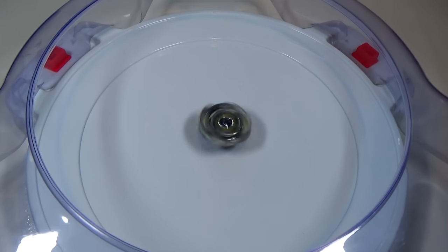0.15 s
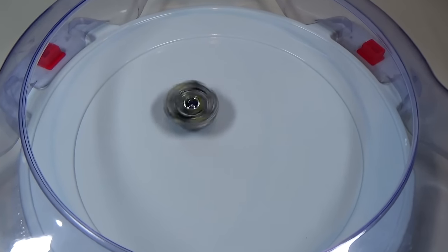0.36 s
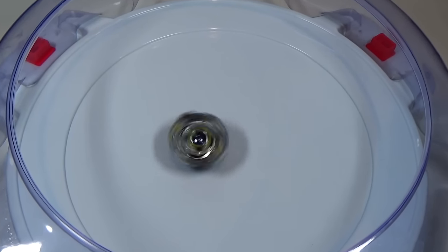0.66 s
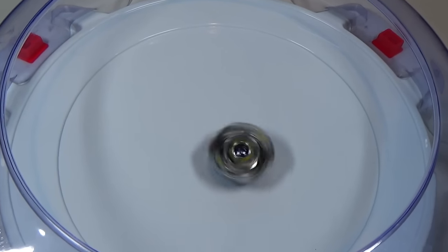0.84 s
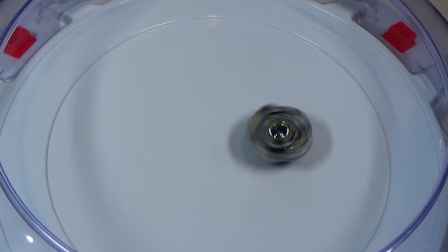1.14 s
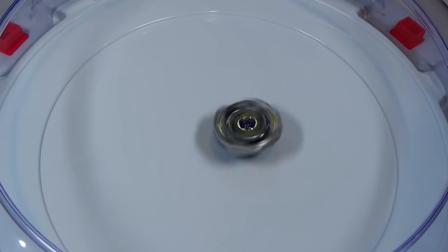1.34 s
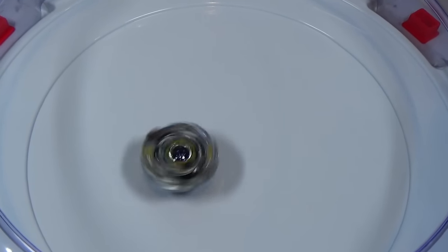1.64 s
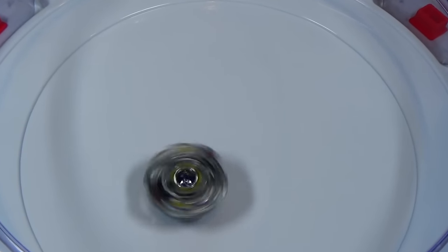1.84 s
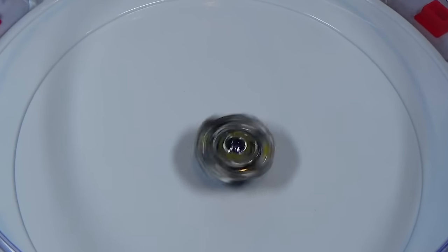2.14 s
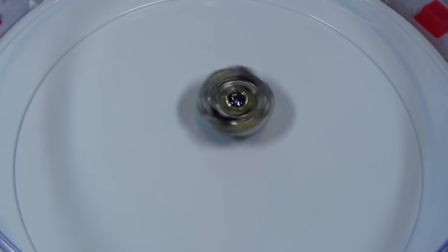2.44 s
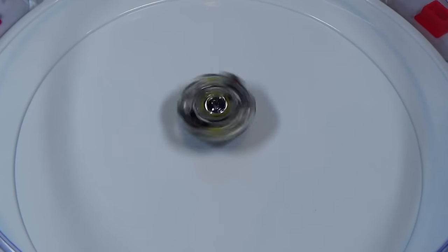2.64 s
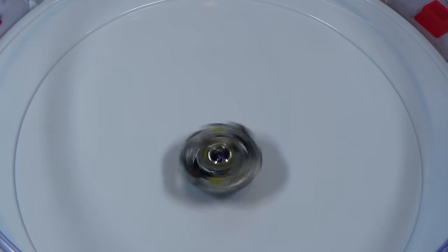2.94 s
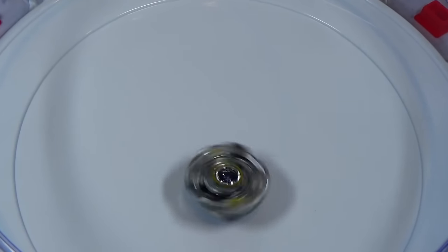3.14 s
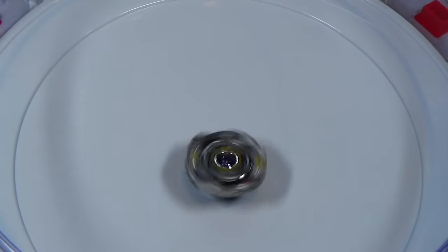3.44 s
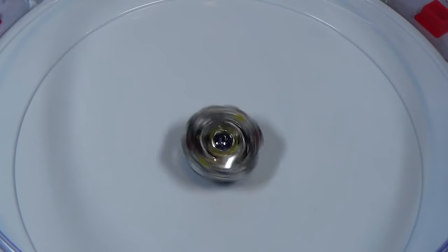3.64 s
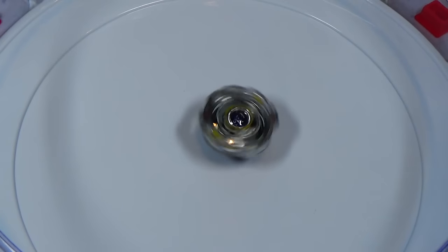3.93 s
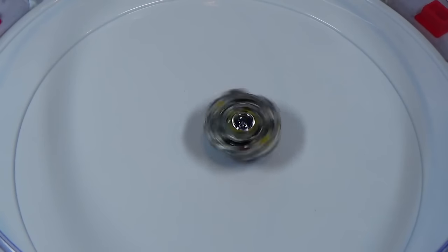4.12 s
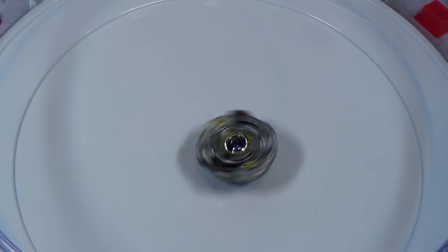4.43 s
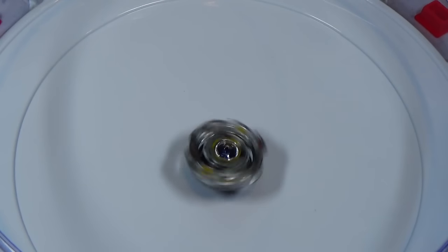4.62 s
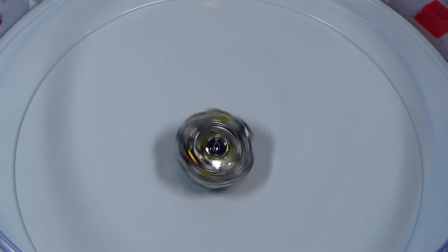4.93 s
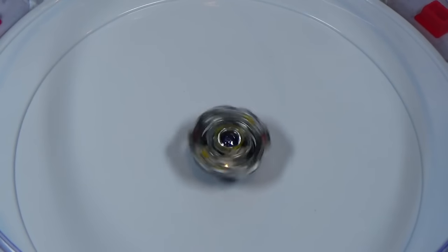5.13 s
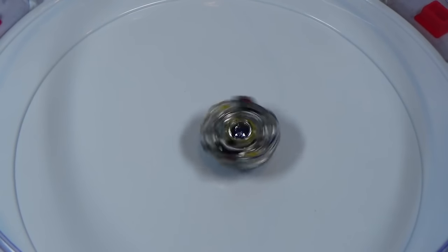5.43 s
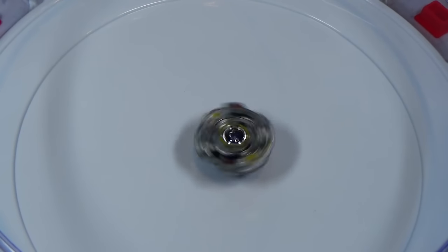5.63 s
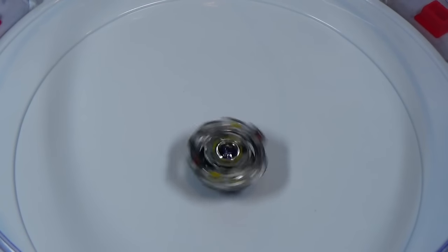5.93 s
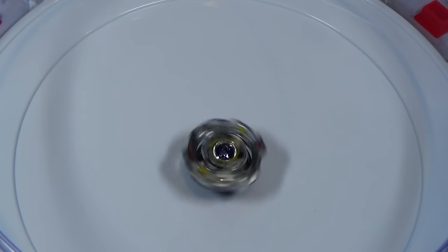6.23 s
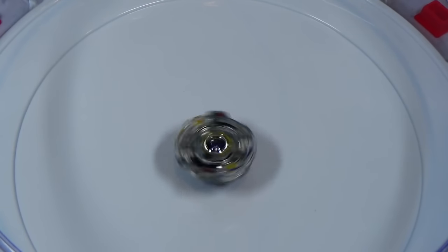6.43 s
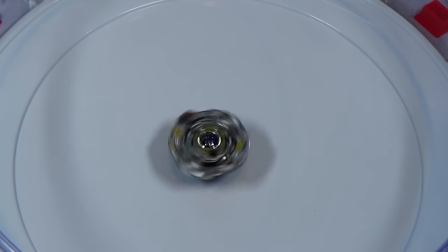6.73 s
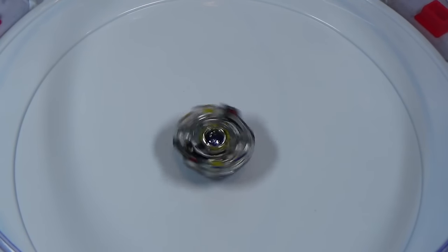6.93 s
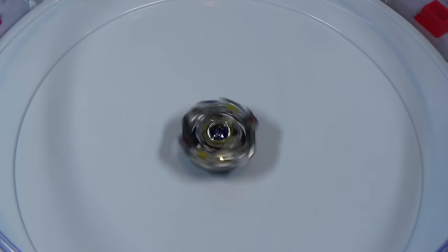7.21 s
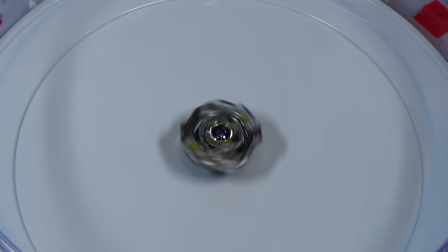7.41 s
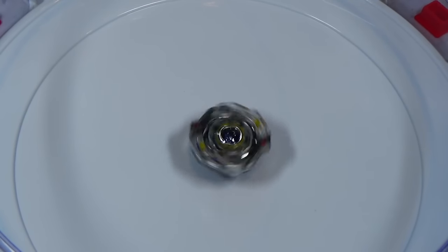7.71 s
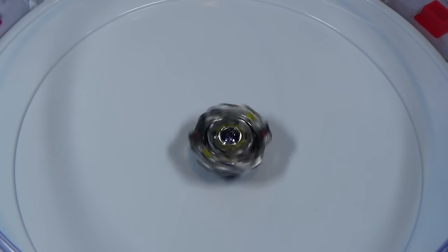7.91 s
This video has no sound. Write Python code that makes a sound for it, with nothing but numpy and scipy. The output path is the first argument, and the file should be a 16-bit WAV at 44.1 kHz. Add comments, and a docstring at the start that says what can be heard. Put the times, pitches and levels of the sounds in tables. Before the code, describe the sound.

Heard up close in a quiet room, a top skitters around a plastic dish with a dense, scratchy rattle. Its plastic body clacks and its metal rings jingle while the dish answers with short, hollow booms. After a lively first half the tapping nearly stops for a moment, then returns lighter over soft rubbing. Faint hiss and electrical hum lie underneath.

```python
"""In a quiet room with a faint mains hum, a spinning top circles in a thin plastic bowl.
Its unbalanced tip rubs, skips and taps the bowl about once a turn. Each impact excites the bowl's
damped modes, a low boom and a higher knock, and shakes the top's loose parts: the plastic clacks
and the metal rings jingle. Short echoes follow, and two close microphone ports give the stereo image."""
import sys
import numpy as np
from scipy import signal
from scipy.fft import rfft, irfft, next_fast_len
from scipy.io import wavfile
from scipy.ndimage import uniform_filter1d

SR = 44100
rng = np.random.default_rng(int(sys.argv[2]) if len(sys.argv) > 2 else 0)


def transcribe(signal):
    """Save signal, clipped to [-1, 1], as a 16-bit WAV file at the path in sys.argv[1]."""
    frames = np.atleast_2d(signal).T
    limited = np.clip(frames, -1, 1)
    pcm = np.round(limited * 32767).astype(np.int16)
    wavfile.write(sys.argv[1], SR, pcm)


N = 355666
RISE_S, BOOM_LEAD_S = 0.001425, 0.00348  # rattle and knock, and the boom, begin this long before a tap


def gain_of(db):
    """Amplitude ratio of a level in decibels."""
    return 10 ** (np.asarray(db) / 20)


def unit_rms(x):
    """Normalisation to an rms of 1."""
    return x / np.sqrt(np.mean(x ** 2) + 1e-20)


def curve_at(points, hz):
    """Interpolation of a spectrum on a logarithmic frequency axis."""
    point_hz, value = np.transpose(points)
    return np.interp(np.log(hz + 1), np.log(point_hz + 1), value)


def resonator(x, hz, bandwidth_hz):
    """Damped oscillator: a unit impulse leaves a decaying sine of amplitude 1."""
    r, w = np.exp(-np.pi * bandwidth_hz / SR), 2 * np.pi * hz / SR
    return signal.lfilter([0, np.sin(w)], [1, -2 * r * np.cos(w), r * r], x)


def minimum_phase(spectrum):
    """Causal impulse response, peak 1: its phase is the Hilbert transform of the log gain."""
    db = np.maximum(curve_at(spectrum, abs(np.fft.fftfreq(4096, 1 / SR))), -100)
    response = np.fft.ifft(np.exp(np.conj(signal.hilbert(np.log(gain_of(db)))))).real[:2048]
    return response / abs(response).max()


def decay(x, ms):
    """Exponential relaxation: each impulse dies away with this time constant."""
    return signal.lfilter([1], [1, -np.exp(-1000 / (ms * SR))], x)


def room_noise():
    """Partly coherent noise: hiss and rumble with faint drifting patches, plus the tones of mains hum."""
    spectrum = [(12, -44), (20, -16), (49, -21), (86, -17), (104, -1), (123, -6), (177, -18), (241, -30),
                (270, -11), (410, -18), (574, -20), (1530, -23), (4540, -31.5), (6180, -31), (11000, -42.5),
                (16000, -40)]  # background noise: frequency_hz, relative_density_db
    coherence = [(60, 1), (240, 0.95), (950, 0.057), (3770, 0.26), (15000, 1)]  # likeness of left and right: frequency_hz, correlation
    hum_tones = [(119.5, -60.5), (238, -61.5)]  # mains hum: pitch_hz, rms_db
    frames, hz = N // 256 + 5, np.fft.rfftfreq(1024, 1 / SR)
    a, b, c, d, patches = rng.standard_normal((frames, 513, 5)).T
    patches = unit_rms(uniform_filter1d(uniform_filter1d(patches, size=12, axis=0), size=14, axis=1))
    alike = np.clip(curve_at(coherence, hz), -1, 1)[:, None]
    left = a + 1j * b
    right = alike * left + np.sqrt(1 - alike ** 2) * (c + 1j * d)
    bands = np.array([left, right]) * gain_of(curve_at(spectrum, hz)[:, None] + 0.27 * patches)
    hiss = gain_of(-53.5) * unit_rms(signal.istft(bands, nperseg=1024, noverlap=768)[1][:, :N])
    t = np.arange(N) / SR
    return hiss + sum(np.sqrt(2) * gain_of(db) * np.sin(2 * np.pi * f * t) for f, db in hum_tones)


def echoes(x):
    """Reverberation: sparse reflections of random sign, each band dying at its own rate."""
    decay_times = [(200, 0.1), (1400, 0.074), (4000, 0.033), (10000, 0.023)]  # reverberation time: frequency_hz, t60_s
    reflections = np.zeros((2, SR // 2))
    at = np.arange(100, SR // 2 - 20, 20) + rng.integers(0, 20, (2, (SR // 2 - 101) // 20))
    np.put_along_axis(reflections, at, rng.choice([-1., 1.], at.shape), 1)
    hz, t, bands = signal.stft(reflections, SR, nperseg=256)
    tail = signal.istft(bands * gain_of(-60 * t / curve_at(decay_times, hz)[:, None]), SR, nperseg=256)[1]
    split_rad = 0.15  # close ports hear much the same echoes; 0 is alike
    tail[1] = np.cos(split_rad) * tail[0] + np.sin(split_rad) * tail[1]
    return signal.fftconvolve(x[None], tail / np.linalg.norm(tail[0]), axes=1)[:, :N]


def microphone_ports(x):
    """Stereo cues: the two ports differ a little in phase and level."""
    phase_lead = [(60, 0.1), (250, 0.18), (450, 0.34), (1100, 0.51), (2000, 0.26), (5000, 0.16),
                  (7000, 0.39), (10000, 0.017), (16000, 0.022)]  # phase difference: frequency_hz, left_lead_rad
    level_tilt = [(60, -.6), (700, -.5), (1290, .5), (2380, -.4), (4400, 0)]  # level difference: frequency_hz, left_minus_right_db
    size = next_fast_len(N + SR // 10)
    hz = np.fft.rfftfreq(size, 1 / SR)
    half = gain_of(curve_at(level_tilt, hz) / 2) * np.exp(.5j * curve_at(phase_lead, hz))
    return irfft(rfft(x, size) * np.array([half, 1 / half]), size)[:, :N]


def tip_path():
    """Sliding contact: the rubbing amplitude and the distance from the bowl's centre at each sample."""
    path = [(0.0, -30.5, 0.8), (0.2, -42, 0.4), (0.56, -33.5, 1), (0.9, -41, 0.4), (1.3, -36.5, 0.98),
            (1.62, -41, 0.32), (1.95, -36.5, 0.8), (2.25, -44, 0.74), (2.62, -34.5, 0.57), (3.0, -43, 0.76),
            (3.281, -44, 0.41), (3.5, -38, 0.43), (3.8, -47.5, 0.52), (4.35, -46, 0.33), (4.9, -53.5, 0.56),
            (5.5, -44.5, 0.22), (6.64, -44, 0.4), (8.06, -44, 0.3)]  # course of the tip: time_s, rub_db, radius_fraction
    time_s, rub_db, radius = np.transpose(path)
    t = np.arange(N) / SR
    return gain_of(np.interp(t, time_s, rub_db)), np.clip(np.interp(t, time_s, radius), 0, 1)


def tip_grit(per_s, spread_db):
    """Shot noise: random small skips of the tip, a few of them large."""
    size = gain_of(spread_db * np.minimum(rng.exponential(1, N), 4))
    return unit_rms(size * rng.choice([-1., 1.], N) * (rng.random(N) < per_s / SR))


def tip_taps(turns):
    """Rotating imbalance: after a landing the tip taps and rebounds once a turn, as a rule ever weaker."""
    # landings of the tip: start_s, rattle_db, boom_over_rattle_db, jingle_over_clack_db, loss_per_turn_db
    landings = [(0.0075, -32.5, 6.5, 2, 25), (0.0337, -24.5, 1, 7, -2), (0.0539, -14.5, -5, 5, 24),
                (0.1161, -24.5, -9, -5, 8), (0.1296, -28.5, -9, -3, 8), (0.1416, -25.5, -1, 8, 14),
                (0.209, -30.5, -1, -7.5, 28), (0.2693, -28, -9, -12, 39), (0.3242, -32.5, 3.5, -4, 8),
                (0.3377, -26.5, -4, -5.5, 14), (0.3909, -23.5, 0.5, 8, 5.5), (0.4496, -25, 2.5, 3, 9),
                (0.4954, -24, 7.5, 1.5, 3), (0.5411, -20, -1, 0, 2.5), (0.5895, -25.5, 2.5, -0.5, 18),
                (0.6297, -22, 4.5, -0.5, 8), (0.6445, -23, 3, 2, 8.5), (0.682, -30, -7, 3, 26),
                (0.7077, -22, -9, 2.5, 23), (0.737, -25, 1.5, 9, -3), (0.7579, -18, -5, 0.5, 20),
                (0.8527, -32.5, 0.5, -7, 24), (0.9256, -30, -8, 2.5, 18), (0.9736, -30.5, -1.5, -5.5, 18),
                (1.0413, -26, 7.5, 1, 8), (1.0563, -18.5, -5, -1, 13), (1.12, -27.5, 6.5, 7, 7),
                (1.1618, -21.5, -1.5, -2, 15), (1.1891, -24.5, -2, -2, 3), (1.229, -24, -6, 9, -0.5),
                (1.2603, -20, 3, 4, 19), (1.297, -23.5, 4, -1.5, 3.5), (1.33, -23.5, -2, 5, 0),
                (1.3643, -20.5, -3.5, 8, 10.5), (1.4157, -21.5, 1.5, 0, 8), (1.4324, -17.5, -3, 0.5, 12.5),
                (1.5016, -24, 0, 4, -1), (1.5214, -21, -2.5, -1, 18), (1.6064, -31.5, 1, -2, 8.5),
                (1.6758, -39.5, 1, 1, 21), (1.7036, -33, -1, -12, 10), (1.746, -30.5, 7, 1, 8),
                (1.7609, -29, 0.5, -1.5, 7.5), (1.815, -22.5, -4, 1.5, 10), (1.8673, -27.5, 0.5, 0, 1),
                (1.9257, -25.5, 2, 3, 4), (1.9667, -24.5, 1.5, 6, 5.5), (2.0357, -28.5, 12, 0, 8),
                (2.0487, -21.5, 2.5, 0.5, 17), (2.132, -36.5, -5, -6, -10), (2.1548, -25, -7, -15, 8.5),
                (2.2485, -23.5, 0, -5, 4), (2.2675, -23, -2, -1, 14), (2.3448, -29.5, -1, -3, 8),
                (2.3577, -27.5, 3.5, -4.5, 8), (2.3797, -29, -7, 1, 25), (2.42, -28, 8.5, 1, 4),
                (2.439, -20.5, -2.5, 2.5, 27), (2.4635, -24.5, -3.5, -3, 10), (2.5007, -33.5, 2, 0, 3),
                (2.5625, -29.5, 5, -8, 6.5), (2.6158, -25.5, -7, -5, 20), (2.64, -29, 0, -1, 2.5),
                (2.685, -24, 1, 1.5, 17), (2.7239, -24, 2, -3.5, 4), (2.7759, -21, 1.5, 0.5, 8),
                (2.7914, -26, 4, -3, 10), (2.8553, -26, 4.5, -1, 8), (2.873, -19, -2, -3, 24),
                (2.9644, -25.5, 7.5, 3, 0), (2.9847, -19, -5, 1, 17), (3.07, -24, 4, 5, 6.5),
                (3.164, -37.5, 5, 0, 3), (3.1915, -31.5, 1, -10, 7.5), (3.3478, -31, 0.5, -3, 8),
                (3.3608, -33.5, 3, 4, 2), (3.4047, -30, 2, 4, 9.5), (3.4697, -27.5, -1.5, -5, 9),
                (3.517, -29, -3.5, -17, 10), (3.544, -24, 2, 2, 8), (3.6357, -30.5, 1.5, -7, 2),
                (3.6586, -22.5, -10, 1.5, 29), (3.7843, -29, 1, -7, 6), (3.8043, -24, -3, -3.5, 14),
                (3.9028, -31.5, 4.5, -7, 3), (3.941, -37.5, 2, 0, 20), (4.0167, -38.5, 1, -5, 19),
                (4.0398, -39.5, -2, 6, 25), (4.18, -39.5, 3.5, -5, 3), (4.2307, -33.5, 3, -4, 8),
                (4.2486, -29, 0, -1.5, 7.5), (4.3167, -26, -3.5, -6, 13), (4.3707, -34, 1, 1, 8),
                (4.3831, -32.5, 4.5, 0, 8.5), (4.414, -33, 3, -2.5, 17), (4.487, -35.5, 1, 3, 12),
                (4.5119, -29.5, -2, -5, 18), (4.634, -36.5, 0.5, -10, 8), (4.6435, -39.5, -2, 1.5, 13),
                (5.0023, -40.5, 6.5, -9, 10), (5.0678, -41, 4, -6, 8.5), (5.1394, -37.5, 0, -8, 8),
                (5.1546, -37.5, 1.5, 11, 16), (5.223, -30.5, 1, -0.5, 8), (5.24, -29.5, 2, -1, 5.5),
                (5.2896, -30, -10, -2, 8), (5.305, -32.5, 2, 3, 7), (5.3719, -33, -5, -6, 1),
                (5.3802, -31, 1, -6, 7), (5.4384, -35, 1.5, -4, 5.5), (5.503, -28.5, -9, -5.5, 30),
                (5.5387, -37, -3, -1, 32), (5.5758, -27, -14, -9.5, 8), (5.5946, -35, 5, -2, 12),
                (5.6346, -37.5, -6, -6, 21), (5.701, -33, -6, -7, 8), (5.716, -30.5, 0, -3.5, 17),
                (5.7504, -37, 2.5, 2, -2.5), (5.7808, -38.5, 8.5, -1, 8), (5.8451, -35.5, -8, -1, 11),
                (5.8581, -35, 6, 2, 5.5), (5.8991, -31.5, -1, 0, 7), (5.919, -29.5, 3, 0, 5.5),
                (6.0033, -30.5, -3.5, -8, 16), (6.0485, -39, 2, -6, 11), (6.1253, -33.5, 1.5, -8, 25),
                (6.2046, -34.5, -3, -4, 11), (6.288, -32, -11, -5, 5), (6.3078, -43, 7.5, -3, 4.5),
                (6.4045, -31, 1, -2, 13), (6.4256, -27, 1, 4.5, 8), (6.4423, -32.5, 0, 7, 10),
                (6.4624, -30, 1.5, -1, 20), (6.4845, -29, 0, -7, 9), (6.6003, -28, -4.5, -9, 15),
                (6.6258, -27.5, 0, 4, 22), (6.658, -30.5, -3, -3, 8), (6.6741, -31.5, 1.5, 2, 3.5),
                (6.7166, -31, 2, 1, 17), (6.7536, -33.5, 3, -1, 3.5), (6.835, -36, -3, -15, 8),
                (6.8463, -37.5, 4, 3, 9), (6.8888, -35, -5, -8, 24), (6.9496, -29.5, -4, -2, 15),
                (6.9725, -28.5, 2, -1.5, 8), (6.987, -34, 0.5, 5, 4.5), (7.046, -32, 3.5, -6, 8),
                (7.0649, -32.5, 3.5, 0, 8), (7.0812, -34.5, 4, 5, 2), (7.1192, -35, 2, -5, 12),
                (7.1421, -32, 3.5, -1, 21), (7.1716, -30.5, 0.5, -3, 5), (7.2267, -33, 3.5, -5, 8),
                (7.242, -33, -4, 2, 29), (7.2776, -33.5, -3, -8, 8), (7.3003, -32, 5.5, 1, 9.5),
                (7.3787, -36.5, -7, -3.5, 17), (7.4228, -37.5, 3, -6, 0.5), (7.463, -31.5, -0.5, -2.5, 19),
                (7.5467, -35, -4, -6, 34), (7.5802, -33, -1.5, 1, 11), (7.6281, -31.5, 5, -2, 8),
                (7.6457, -32.5, 6.5, 0, 8), (7.662, -33, -7, 11, 17), (7.706, -30.5, -4, -7, 8),
                (7.7253, -31.5, 2.5, -2, 10), (7.8059, -40, 1, -3, 22), (7.8462, -38, 1.5, -7, 5),
                (7.8689, -39.5, 3.5, 1, 5), (7.9479, -30.5, -5.5, -5, 14), (8.0284, -36, -0.5, -1, 14)]
    start_s, rattle_db, boom_over_db, bright_db, loss_db = np.transpose(landings)[:, :, None]
    spin_hz, slowing_hz_per_s = 57, 1.0
    rebound_turns, jitter_turns, spread_db = 0.66, 0.09, 2.0
    step = np.arange(2 * turns + 1)
    later, rebound = step > 0, step % 2
    turn = step // 2 + rebound_turns * rebound
    turn_s = 1 / (spin_hz - slowing_hz_per_s * start_s)
    late, jingle, clack, boom, knock = np.moveaxis(rng.standard_normal((len(start_s), len(step), 5)), 2, 0)
    tap_s = start_s + (turn + jitter_turns * later * np.clip(late, -2, 2)) * turn_s
    level_db = rattle_db - loss_db * turn
    jingle_db = level_db + np.where(later, spread_db * jingle, np.minimum(bright_db, 0)) - 5 * rebound
    clack_db = level_db + np.where(later, spread_db * clack, -np.maximum(bright_db, 0)) - 6.5 * rebound
    boom_db = level_db + boom_over_db + spread_db * later * boom - 2 * rebound
    knock_db = level_db + 0.49 * boom_over_db + spread_db * knock - 0.5 * rebound
    before_next = start_s + (turn + .35) * turn_s < np.append(start_s[1:], N / SR)[:, None]
    return [column[~later | before_next] for column in (tap_s, jingle_db, clack_db, boom_db, knock_db)]


def rattle(colour, modes, tap_s, tap_db, rub_db, modes_db, rise_ms, fall_ms, spread_db):
    """Source and filter: loose parts chatter at each tap, heard through a broad colour and narrow modes."""
    rub, _ = tip_path()
    mode_mix = rng.standard_normal((len(tap_s), len(modes)))
    roughness = gain_of(2.92 * unit_rms(uniform_filter1d(rng.standard_normal(N), size=30)))
    rubbing = gain_of(rub_db) * rub * tip_grit(per_s=6000, spread_db=4.0)
    onsets = np.clip(np.round((tap_s - RISE_S) * SR).astype(int), 0, N - 1)

    def chatter(db):
        """Amplitude-modulated noise: a burst at each tap, over the rubbing."""
        hits = np.zeros(N)
        np.add.at(hits, onsets, gain_of(db))
        skid = gain_of(-12) * decay(hits[::-1], ms=2.2)[::-1] * (1 - np.sign(hits))  # the tip slides in
        envelope = decay(hits, fall_ms) - 0.21 * decay(hits, rise_ms) + skid
        return envelope * roughness * rng.standard_normal(N) + rubbing

    sound = signal.oaconvolve(chatter(tap_db), minimum_phase(colour))[:N]
    for k, (hz, bandwidth_hz, db) in enumerate(modes):
        shake = chatter(tap_db + spread_db * mode_mix[:, k])
        sound += gain_of(db + modes_db) * np.sqrt(bandwidth_hz / SR) * resonator(shake, hz, bandwidth_hz)
    return sound


def plastic_clack(tap_s, tap_db):
    """Forced vibration: chatter drives the resonances of the top's plastic body."""
    colour = [(710, -23.5), (1200, -9), (1590, -3.5), (2150, -5.5), (3410, -4.5), (4910, -12.5),
              (5400, 0.5), (6200, -24), (8060, -45), (13600, -120)]  # broad spectrum of the clack: frequency_hz, density_db
    modes = [(2737, 68, 9), (3430, 170, 11.5), (3900, 50, -1), (4180, 66, -3), (4640, 25, -8),
             (5430, 100, 2)]  # body modes: pitch_hz, bandwidth_hz, level_db
    return rattle(colour, modes, tap_s, tap_db, rub_db=-29.0, modes_db=3,
                  rise_ms=0.79, fall_ms=4.19, spread_db=1.5)


def metal_jingle(tap_s, tap_db):
    """Forced vibration: chatter drives the high resonances of the top's loose metal rings."""
    colour = [(3820, -35), (6500, -11), (8370, 3), (9090, 0.5), (10600, 2.5), (14100, -3.5), (15200, -10),
              (16000, -17.5)]  # broad spectrum of the jingle: frequency_hz, density_db
    modes = [(6790, 24, -4), (7240, 90, -6), (7450, 78, 2), (8140, 16, 3.5), (8760, 180, -5),
             (8740, 40, -5), (10230, 280, 4), (10650, 60, -1), (12400, 120, -8), (13580, 20, 4),
             (14700, 45, -3)]  # ring modes: pitch_hz, bandwidth_hz, level_db
    return rattle(colour, modes, tap_s, tap_db, rub_db=-22.5, modes_db=-3.5,
                  rise_ms=0.4, fall_ms=3.04, spread_db=4.5)


def struck_bowl(modes, tap_s, tap_db, rub_db, early_s, spread_db, detune, push_ms, damp_ms):
    """Modal superposition: the spot struck sets the mix of modes, and the next contact damps them."""
    rub, radius = tip_path()
    hz, bandwidth_hz, rim_db, centre_db = np.transpose(modes)[:, :, None]
    skips = gain_of(rub_db) * rub * tip_grit(per_s=310, spread_db=3.0)
    sound = np.zeros(N)
    for k in range(len(modes)):
        coupling = gain_of(centre_db[k] + (rim_db[k] - centre_db[k]) * radius)
        sound += (-1) ** k * resonator(skips * coupling, hz[k, 0], bandwidth_hz[k, 0])
    starts, t = np.clip(tap_s - early_s, 0, (N - 1) / SR), np.arange(SR // 12) / SR
    gaps = abs(np.diff(starts, append=np.inf))
    chance = rng.standard_normal((len(tap_s), 3, len(modes), 1))
    grips = np.minimum(gain_of(np.diff(tap_db, append=0) - 2.0), 1)  # a light next touch damps less
    for start_s, free_s, grip, db, (spot, load, phase) in zip(starts, gaps, grips, tap_db, chance):
        at = round(start_s * SR)
        size = gain_of(centre_db + (rim_db - centre_db) * radius[at] + spread_db * spot)
        loaded_hz = hz * (1 + detune * load)  # the top's weight shifts each mode a little
        partials = size * np.exp(-np.pi * bandwidth_hz * t) * np.sin(2 * np.pi * (loaded_hz * t + phase))
        blow = partials.sum(axis=0) * (1 - np.exp(-1000 * t / push_ms))  # the tip presses in gradually
        blow *= gain_of(db) / np.std(blow[:SR // 100])  # the tap sets the level, whatever the mix
        blow *= np.exp(-1000 * grip * np.maximum(t - free_s, 0) / damp_ms)
        sound[at:at + len(blow)] += blow[:N - at]
    return sound


def wall_knock(tap_s, tap_db):
    """Impact excitation: the higher modes of the bowl's wall die quickly, as a knock."""
    modes = [(623, 81, -1, -0.5), (779, 38.4, 2.5, -3), (873, 85, 6, 7), (990, 51, 2, 1),
             (1131, 60, 3.5, 0.5), (1321, 79, -1, 2.5), (1572, 46, -0.5, 2)]  # wall modes: pitch_hz, bandwidth_hz, struck_off_centre_db, struck_centre_db
    return struck_bowl(modes, tap_s, tap_db, rub_db=-36.5, early_s=RISE_S,
                       spread_db=2.0, detune=0.027, push_ms=1.0, damp_ms=12.0)


def bowl_boom(tap_s, tap_db):
    """Impact excitation: the low modes of the thin bowl ring longer, as a boom."""
    modes = [(87, 22.6, -23, -11), (125, 40, -27, -26), (231.3, 19, -6.5, -13), (287.7, 25, -2.5, -2),
             (308, 29.8, 8, -4.5), (345.5, 51, -3, 5), (404, 33.3, -6, 2.5), (441, 31, -19.5, 7),
             (481.3, 8.8, -20.5, -10.5)]  # low modes: pitch_hz, bandwidth_hz, struck_off_centre_db, struck_centre_db
    return struck_bowl(modes, tap_s, tap_db, rub_db=-30.0, early_s=BOOM_LEAD_S,
                       spread_db=2.5, detune=0.036, push_ms=1.57, damp_ms=14.0)


def scene():
    """Superposition of the direct sound of bowl and top, their echoes and the room noise."""
    tap_s, jingle_db, clack_db, boom_db, knock_db = tip_taps(turns=4)
    direct = bowl_boom(tap_s, boom_db - 6.5) + wall_knock(tap_s, knock_db - 11.0)
    direct += plastic_clack(tap_s, clack_db - 14.0) + metal_jingle(tap_s, jingle_db - 6.0)
    bass_cut = signal.butter(3, 70, "high", fs=SR, output="sos")  # a small bowl radiates no deep bass
    direct = signal.sosfilt(bass_cut, direct)
    return microphone_ports(direct) + gain_of(-10) * echoes(direct) + room_noise()


def record(dry):
    """Band limiting: a steep linear-phase low-pass removes the highest treble."""
    low_pass = signal.firwin(511, cutoff=15760, window=("kaiser", 9), fs=SR)
    return signal.oaconvolve(dry, low_pass[None], "same")


dry = scene()
out = record(dry)
transcribe(out)
```